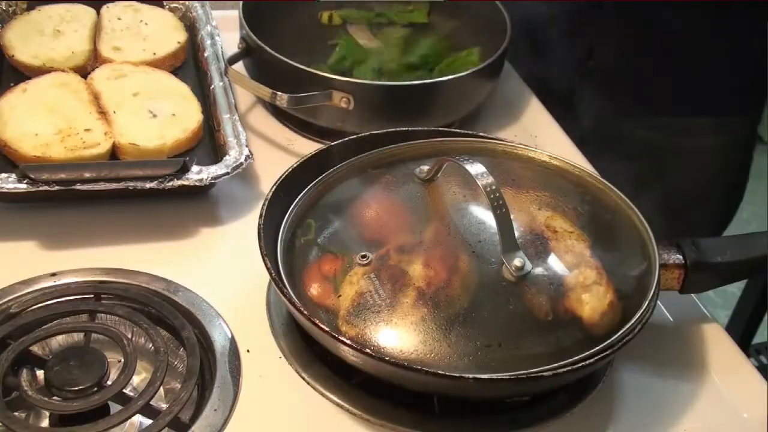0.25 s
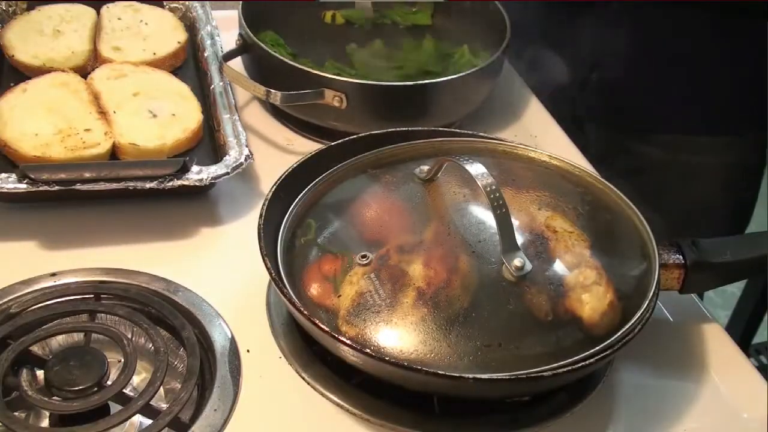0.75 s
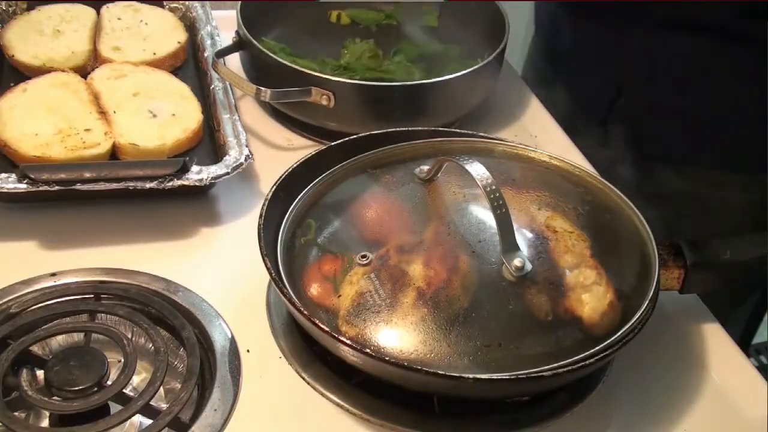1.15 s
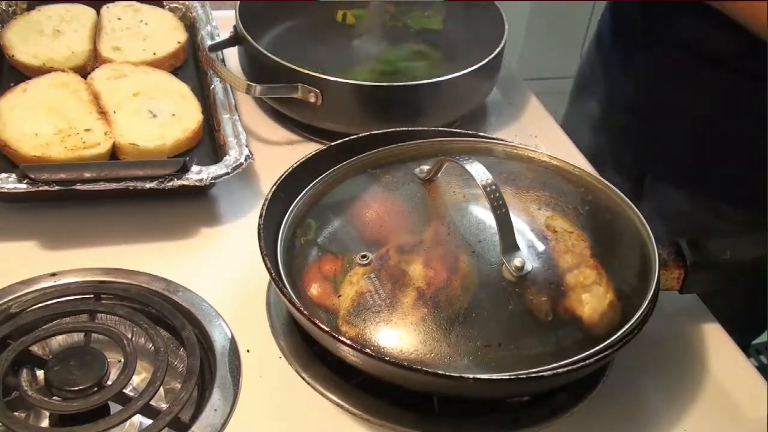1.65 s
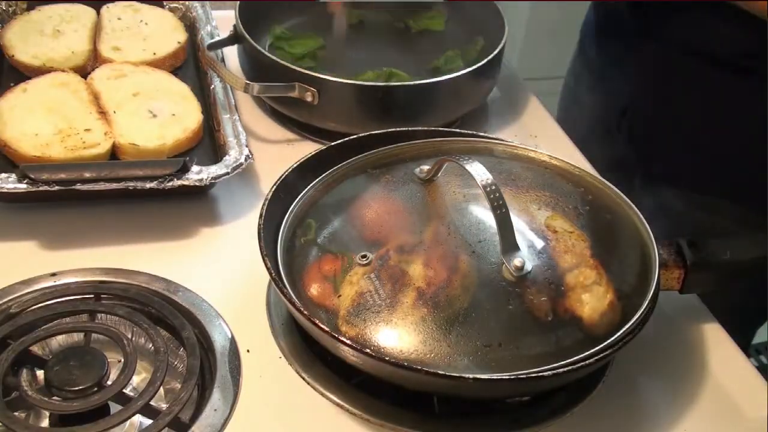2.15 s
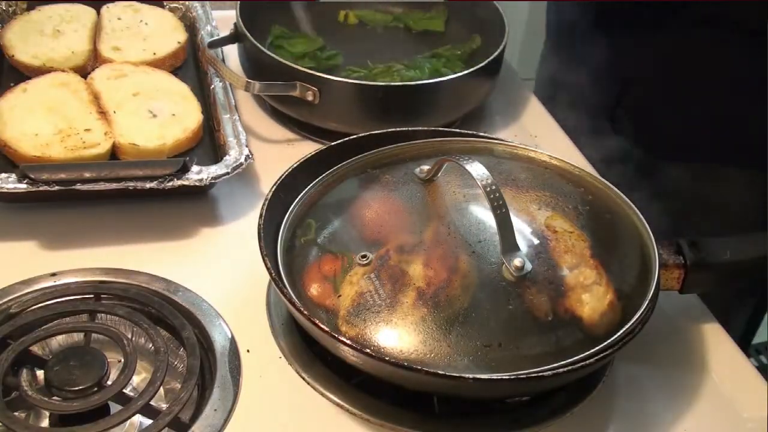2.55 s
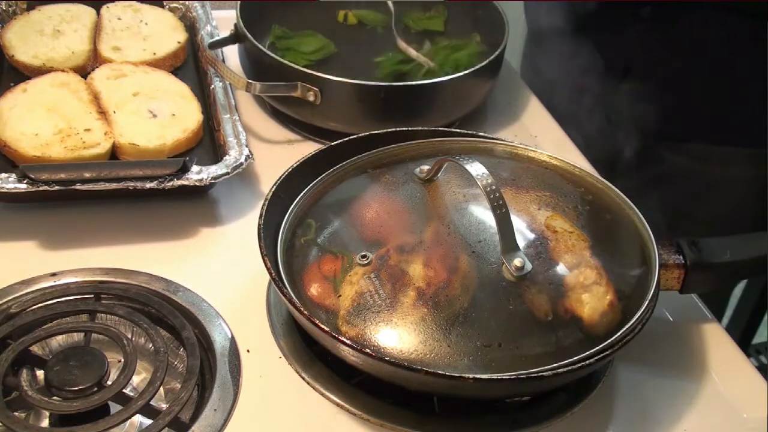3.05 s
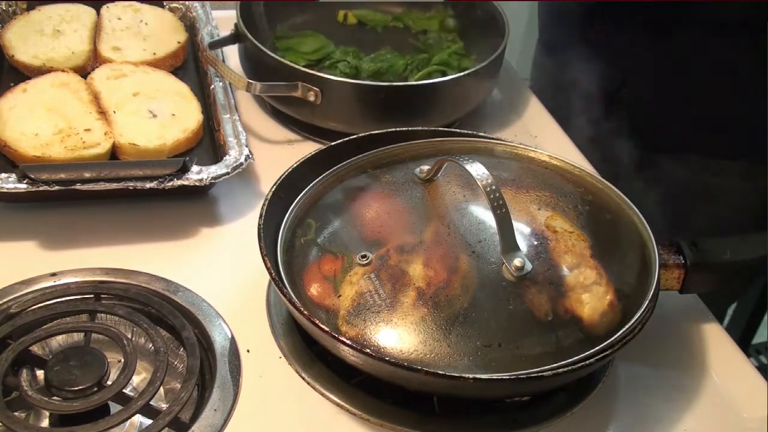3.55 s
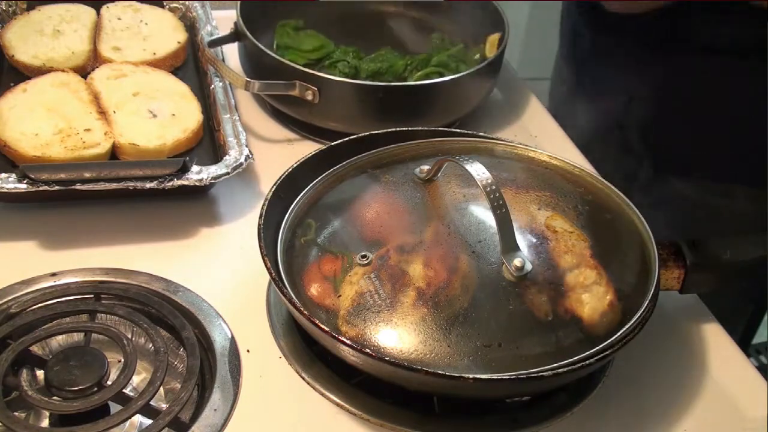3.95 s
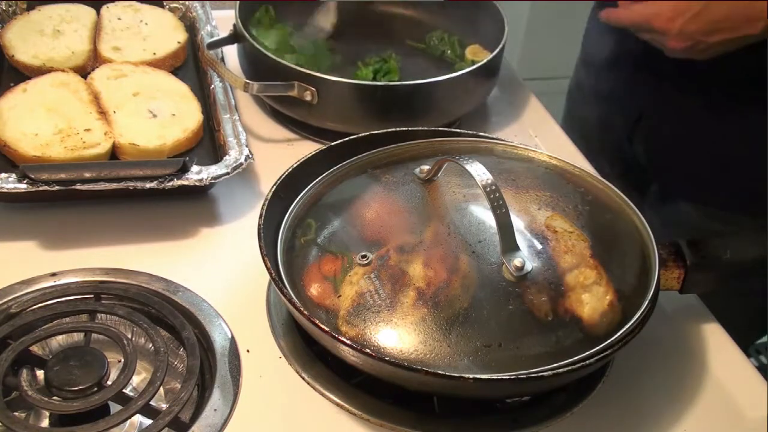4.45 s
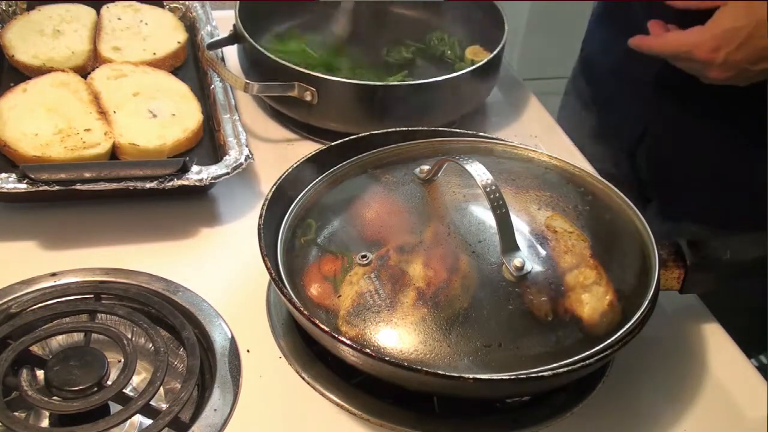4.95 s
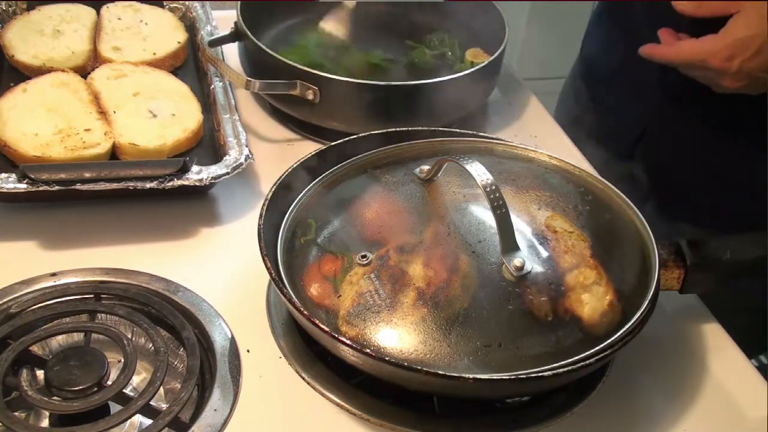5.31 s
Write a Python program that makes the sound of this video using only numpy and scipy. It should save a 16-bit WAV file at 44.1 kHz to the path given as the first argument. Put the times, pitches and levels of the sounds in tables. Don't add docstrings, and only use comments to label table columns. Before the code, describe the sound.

A close, bright hiss of frying crackles and spits in metal pans while a spatula stirs softly and once clinks hard on steel.

```python
import sys
import numpy as np
from scipy import signal
from scipy.fft import rfft, irfft, next_fast_len
from scipy.io import wavfile
from scipy.ndimage import uniform_filter1d, map_coordinates

SR = 44100
rng = np.random.default_rng(int(sys.argv[2]) if len(sys.argv) > 2 else 0)


def to_wav(s):
    ch = np.atleast_2d(s).T
    pcm = np.round(np.clip(ch, -1, 1) * 32767)
    wavfile.write(sys.argv[1], SR, pcm.astype(np.int16))


def level_to_linear(level):
    exponent = np.asarray(level, float) / 20
    return 10 ** exponent


N = 246095

# (frequency [Hz], spectral density [dB per Hz])
RUMBLE_SPECTRUM = [(15, -30), (30, -22), (55, -7), (70, -15), (85, 0), (200, -1), (250, -7), (290, -2.5),
                   (320, -1.5), (362, 5), (420, -8), (600, -22)]
# (time [s], rumble rise [dB])
COOK_MOVES = [
    (4.1, 1),
    (4.3, 4),
    (4.62, 9.5),
    (4.95, 4),
    (5.3, 6.5),
    (5.58, -2),
]
# (frequency [Hz], side minus mid [dB])
STEREO_WIDTH = [(30, -17), (60, -27), (200, -12.5), (700, -15), (1200, -11.5), (2300, -16), (3300, -10.5),
                (6400, -10.5), (8000, -9.5), (9500, -3), (11300, -9.5), (11700, -20), (12000, -30)]
# (frequency [Hz], t60 [s])
ROOM_DECAY = [(200, 0.8), (2000, 0.27), (10000, 0.087)]
# (time [s], level [dB], frequency [Hz])
TAPS = [(.195, -32, 2670), (.490, -27, 2140), (.895, -27, 1800), (1.108, -30, 2160), (3.199, -26, 2380),
        (3.199, -26, 2980), (3.342, -25, 2564), (4.119, -28, 6100), (4.920, -23.5, 4050),
        (5.210, -27, 2100), (5.410, -25, 2420), (5.443, -27, 2380), (5.512, -26, 1870), (5.555, -28, 1600),
        (5.555, -33.5, 605)]
# (time [s], level [dB])
CLANK_CONTACTS = [
    (3.655, -16),
    (3.664, -34),
    (3.675, -40),
    (3.697, -23.5),
]
# (frequency [Hz], level [dB], t60 [s])
STEEL_MODES = [(265, -26, .6), (365, -22, .3), (520, -22, .8), (585, -21, .8), (690, -11, .18),
               (800, -8, .4), (900, -4, .22), (975, -10, .5), (1055, -12, .8), (1130, -12, .15),
               (1272, -.5, .5), (1530, -2, .28), (1618, -1, .35), (1750, -12, .2), (1820, -5, .6),
               (2135, -10, .8), (2540, -11, .2), (2650, -11, .15), (2864, -3, .3), (3000, -9, .2),
               (3300, -3, .08), (3595, -9, .3), (3989, -2.5, .4), (4410, -9, .2), (4470, -10, .25),
               (4800, -14, .25), (5270, -10, .2), (5800, -9, .12), (6130, -10, .1), (7300, -9, .1)]
# (frequency [Hz], spectral density [dB per Hz])
RATTLE_SPECTRUM = [(300, -34), (600, -5), (1000, 3), (1800, 3), (2400, 1), (3000, -6), (5000, -28),
                   (9000, -30)]
# (frequency [Hz], spectral density [dB per Hz])
CRACK_SPECTRUM = [(1500, -33), (3000, 0.5), (6000, -4), (8000, -2), (9500, -2), (11000, -10), (13000, -40)]
# (time of the top [s], swell [dB], length [s])
STROKES = [(0.267, 1, 0.13), (0.597, 0.5, 0.18), (0.754, 1.5, 0.11), (1.06, 0.5, 0.12), (1.39, 2.5, 0.21),
           (1.603, 2, 0.13), (1.94, 4, 0.14), (2.16, 2.5, 0.13), (2.387, 1.5, 0.16), (2.71, 2, .14),
           (3.104, 3, .16), (3.384, 3, 0.25), (3.85, 1.5, 0.13), (4.267, 4, 0.11), (4.493, 2.5, 0.12),
           (4.776, 2, .14), (4.984, 3.5, 0.16), (5.225, 3.5, .06), (5.303, 3.5, 0.1), (5.43, 0.5, 0.072)]
# (time [s], peak level [dB], centre frequency [Hz], fizz surge [dB])
SPITS = [(0.061, -8, 4330, 4), (0.187, -4, 2700, -18), (0.338, -3, 3970, -19), (0.482, -3.5, 2150, -18),
         (0.515, -9, 2010, -4), (0.715, -12, 2440, 2), (0.816, -9, 2430, -12), (0.892, -1.5, 2400, -28),
         (1.104, -4.5, 2130, -5), (1.169, -5.5, 2960, -18), (1.273, -6, 3780, -20), (2.151, -9, 2510, -20),
         (2.381, -6, 2300, -14), (2.601, -7, 2430, -4), (2.704, -7.5, 2900, 2.5), (3.199, -8, 2430, -27),
         (3.269, -8, 2420, -15), (3.342, -7, 2530, -5), (3.398, -8, 2830, -4), (3.811, -8, 4810, 0.5),
         (4.12, -8, 2920, -4), (4.372, -5, 4870, -4.5), (4.704, -16, 4100, 11), (4.919, -6, 4050, -12),
         (5.289, -22, 3570, 15), (5.393, -8.5, 3570, 1.5), (5.413, -5.5, 2410, -6), (5.445, -5, 2370, -6),
         (5.512, -14, 1870, 4), (5.553, -11, 1590, -10)]
# (time [s], fizz level [dB])
BOILING = [(0, -23.5), (.5, -23), (1.2, -23), (1.8, -22.5), (2.26, -24.5), (2.5, -24), (2.9, -26),
           (3.05, -25.5), (3.57, -26), (3.92, -27), (4.1, -28.5), (4.13, -25), (4.65, -24), (4.9, -23.5),
           (5.15, -24.5), (5.58, -23.5)]
# (frequency [Hz], spectral density [dB per Hz])
FIZZ_SPECTRUM = [(2500, -30), (4500, -9.5), (6500, -2), (8800, -0.5), (10100, -3), (10500, -7), (11700, -5),
                 (12600, -9.5), (13400, -10.5), (13900, -17), (14500, -23), (15600, -12.5)]
# (frequency [Hz], spectral density [dB per Hz])
SPUTTER_SPECTRUM = [(180, -49), (300, -15), (430, -20), (520, -11), (950, -11), (1400, -6), (1680, -6),
                    (1780, -2.5), (3500, -2), (5000, -4.5), (8000, -12.5), (12000, -36)]
# (frequency [Hz], bandwidth [Hz], level over the broad sputter [dB])
PAN_RESONANCES = [(360, 14, 3), (513, 26, 2.5), (611, 48, 3.5), (780, 28, 7), (860, 32, -3), (1076, 31, 8),
                  (1294, 21, 6.5), (1590, 30, -4), (1838, 13.5, 5), (2120, 56, 3), (2452, 15, 3.5),
                  (2510, 26, 1.5), (2860, 13, 8), (4050, 25, 6)]


def unit(x):
    return x / np.sqrt(np.mean(x ** 2) + 1e-20)


def along(points, hz):
    f, v = np.transpose(points)
    return np.interp(np.log(hz + 1), np.log(f + 1), v)


def over_time(rows):
    s, value = np.transpose(rows)
    return np.interp(np.arange(N) / SR, s, value)


def wobble(rate):
    return map_coordinates(rng.standard_normal(4000), [np.arange(N) * rate / SR], mode="wrap")


def filtered(x, response):
    m = next_fast_len(N + SR // 2)
    return irfft(rfft(x, m) * response(np.fft.rfftfreq(m, 1 / SR)), m)[..., :N]


def shaped(x, spectrum):
    return filtered(x, lambda hz: level_to_linear(along(spectrum, hz)))


def stereo(pair):
    side = shaped(pair[1], STEREO_WIDTH)
    return np.array([pair[0] + side, pair[0] - side])


def patchy(depth_db):
    z = signal.stft(rng.standard_normal((2, N)), nperseg=512)[2]
    field = uniform_filter1d(rng.standard_normal(z.shape[1:]), size=3, axis=0)
    field = uniform_filter1d(field, size=7, axis=1)
    return signal.istft(z * level_to_linear(depth_db * unit(field)), nperseg=512)[1][:, :N]


def rumble():
    noise = shaped(patchy(1.2), RUMBLE_SPECTRUM)
    level_db = -53 + over_time(COOK_MOVES) + 0.5 * wobble(3.87)
    return stereo(level_to_linear(level_db) * noise / noise[0].std())


def room_echo(x):
    hz, t, z = signal.stft(rng.standard_normal((2, SR // 2)), SR, nperseg=256)
    decay = level_to_linear(-60 * t / along(ROOM_DECAY, hz)[:, None])
    tail = signal.istft(z * decay, SR, nperseg=256)[1]
    tail = np.array([tail[0] + 0.29 * tail[1], tail[0] - 0.65 * tail[1]])
    delayed = np.pad(x, (200, 0))[None]
    return signal.fftconvolve(delayed, tail / np.linalg.norm(tail[0]), axes=1)[:, :N]


def taps():
    out, t = np.zeros(N + SR), np.arange(SR // 4) / SR
    t60_s, rise_s = 0.22, 0.00087
    for s, db, hz in TAPS:
        drift = 0.015 * np.cumsum(rng.standard_normal(len(t)))
        envelope = level_to_linear(db - 60 * t / t60_s) * (1 - np.exp(-t / rise_s))
        out[round(s * SR):][:len(t)] += envelope * np.sin(2 * np.pi * hz * t + drift)
    return out[:N]


def clank():
    out, t = np.zeros(N + SR), np.arange(SR // 2) / SR
    rattle = unit(shaped(rng.standard_normal(N), RATTLE_SPECTRUM))[:len(t)]
    crack = unit(shaped(rng.standard_normal(N), CRACK_SPECTRUM))[:len(t)]
    rattle_t60_s, crack_t60_s, rise_s = 0.35, 0.2, 0.002
    for s, db in CLANK_CONTACTS:
        ring = np.zeros(len(t))
        for hz, level, t60 in STEEL_MODES:
            level = level + rng.normal(0, 0.73)
            ring += level_to_linear(level - 60 * t / t60) * np.sin(2 * np.pi * hz * t)
        body = ring + 0.45 * level_to_linear(-60 * t / rattle_t60_s) * rattle
        body *= 1 - np.exp(-t / rise_s)
        out[round(s * SR):][:len(t)] += level_to_linear(db) * (body + 1.1 * level_to_linear(-60 * t / crack_t60_s) * crack)
    mute_s, mute_db, mute_length_s = 3.712, -12, 0.0072
    muted = np.clip((np.arange(N) / SR - mute_s) / mute_length_s, 0, 1)
    return out[:N] * level_to_linear(mute_db * muted)


def stirring():
    t = np.arange(N) / SR
    return sum(db * np.exp(-(2 * (t - s) / length) ** 2) for s, db, length in STROKES)


def spits():
    puffs, surge, t = np.zeros((2, N + SR)), np.zeros(N + SR), np.arange(SR // 4) / SR
    t60_s, octaves, rise_s = 0.18, 1.66, 0.00078
    snap_gain, snap_s, crackle_db = 0.64, 0.0034, 3
    for s, db, hz, fizz_db in SPITS:
        shape = level_to_linear(db - 60 * t / t60_s) * (1 - np.exp(-t / rise_s))
        shape *= 1 + snap_gain * np.exp(-t / snap_s)
        grain = unit(uniform_filter1d(rng.standard_normal(len(t)), size=90))
        crackle = unit(level_to_linear(crackle_db * grain))
        edges = np.clip(hz * 2 ** (np.array([-.5, .5]) * octaves), 200, 9000)
        band = signal.butter(2, edges, "band", fs=SR, output="sos")
        noise = signal.sosfilt(band, rng.standard_normal((2, len(t))))
        at = slice(round(s * SR), round(s * SR) + len(t))
        puffs[:, at] += shape * crackle * level_to_linear(-14.5) * unit(noise)
        surge[at] += (shape * level_to_linear(fizz_db - 12.5)) ** 2
    tone = [(500, 0.5), (1300, -3.0), (6000, -3.5), (11000, -18)]  # (frequency [Hz], gain [dB])
    return shaped(puffs[:, :N], tone), surge[:N]


def bursts(count, spread_db, life_s):
    when, size = rng.random((2, count))
    length = N + SR // 10
    energy = level_to_linear(-spread_db * np.log(1 - size)) ** 2
    kicks = np.bincount((when * length).astype(int), energy, length)
    power = signal.lfilter([1], [1, -np.exp(-1 / (life_s * SR))], kicks)[-N:]
    return np.sqrt(power / power.mean())


def bubbles(count, mid_hz, cycles, spread_db):
    when, size, tone = rng.random(count), rng.exponential(size=count), rng.standard_normal(count)
    hz = np.clip(mid_hz * np.exp(.45 * tone), 1700, 13000)[:, None]
    step = np.arange(600)
    turns = hz * step / SR
    peak = level_to_linear(spread_db * np.minimum(size, 3.5))[:, None] * hz / mid_hz
    grain = peak * np.exp(-turns / cycles) * np.sin(2 * np.pi * turns) * np.minimum(turns, 1)
    at = (when * N).astype(int)[:, None] + step
    return unit(np.bincount(at.ravel(), grain.ravel(), N + SR)[:N])


def through_pan(hz):
    power = 1 + sum(level_to_linear(db) ** 2 / (1 + (2 * (hz - centre) / width) ** 2) for centre, width, db in PAN_RESONANCES)
    return level_to_linear(along(SPUTTER_SPECTRUM, hz)) * np.sqrt(power)


def frying():
    heat_db, swell_db = over_time(BOILING), stirring()
    fizz_db = heat_db + swell_db
    sputter_db = heat_db + 0.29 * swell_db - 1.5 - 0.07 * np.arange(N) / SR
    puffs, surge = spits()
    boil_db = 0.33 * wobble(15)
    fizz = shaped(patchy(1.0) * bursts(count=26000, spread_db=1.5, life_s=0.0083), FIZZ_SPECTRUM)
    sputter = filtered(patchy(0.96) * bursts(count=16000, spread_db=2.0, life_s=0.017), through_pan)
    fizz_gain = np.sqrt(level_to_linear(fizz_db + boil_db + 0.98) ** 2 + surge)
    fizz = fizz_gain * fizz / fizz[0].std()
    sputter = level_to_linear(sputter_db + boil_db - 0.05) * sputter / sputter[0].std()
    pops = level_to_linear(fizz_db - 10.5) * bubbles(count=5000, mid_hz=5498, cycles=15, spread_db=-0.5)
    return stereo(fizz + sputter + puffs) + pops


def scene():
    steel = clank() + taps()
    return frying() + rumble() + steel + level_to_linear(-11) * room_echo(steel)


def band_limit(x):
    return signal.sosfilt(signal.butter(12, 16270, fs=SR, output="sos"), x)


def record(dry):
    mix = filtered(dry, lambda hz: hz < 15730)
    return band_limit(mix)


dry = scene()
out = record(dry)
to_wav(out)
```